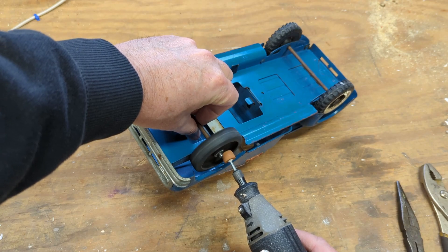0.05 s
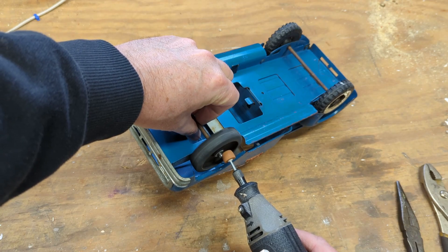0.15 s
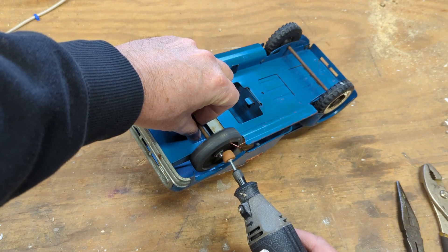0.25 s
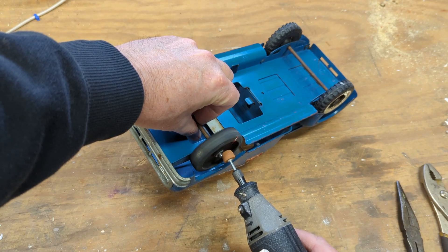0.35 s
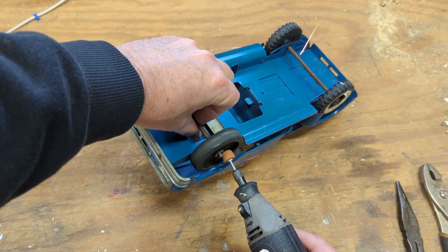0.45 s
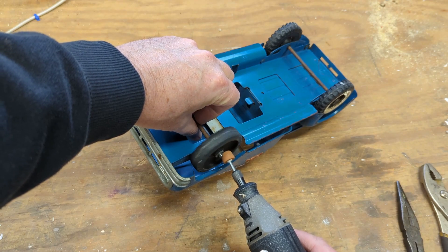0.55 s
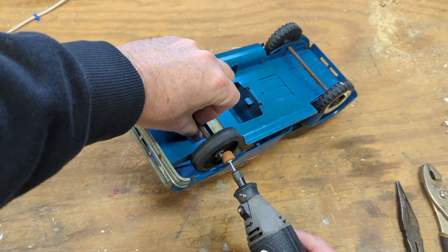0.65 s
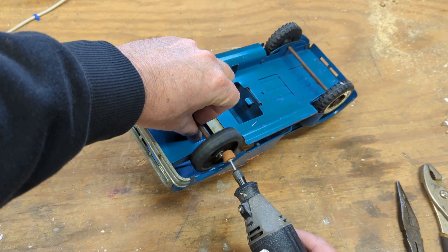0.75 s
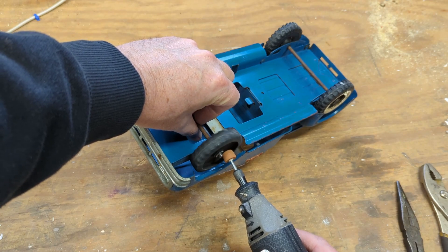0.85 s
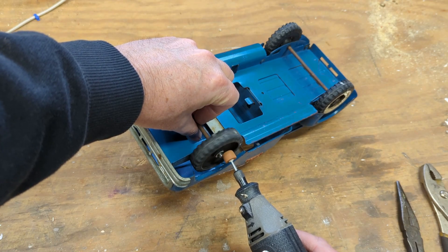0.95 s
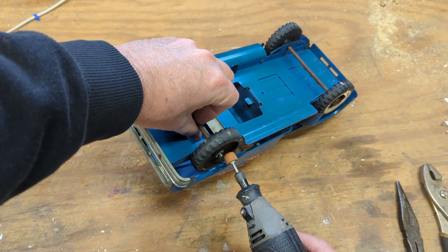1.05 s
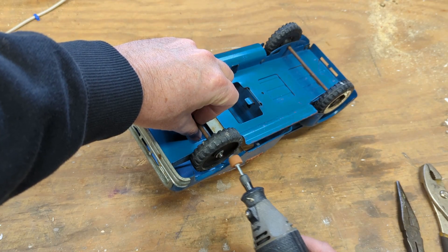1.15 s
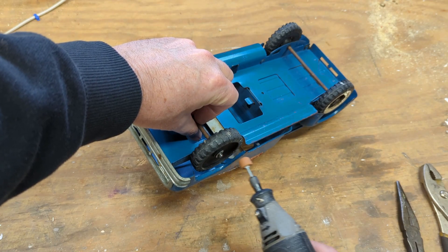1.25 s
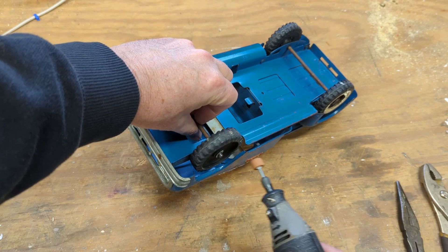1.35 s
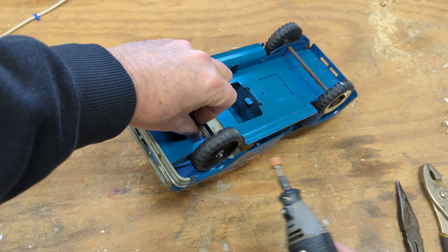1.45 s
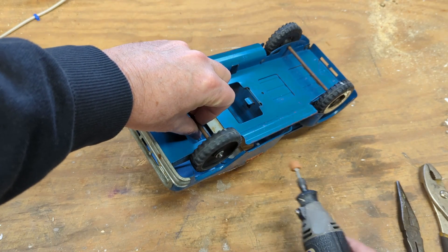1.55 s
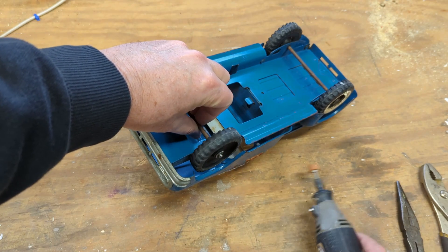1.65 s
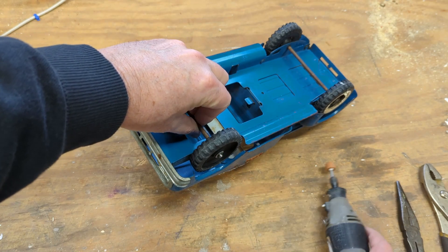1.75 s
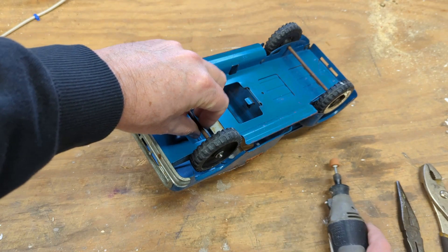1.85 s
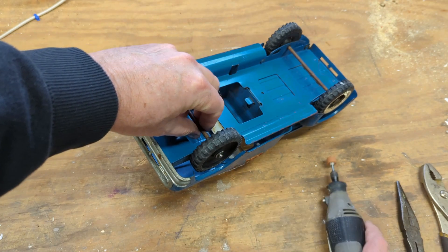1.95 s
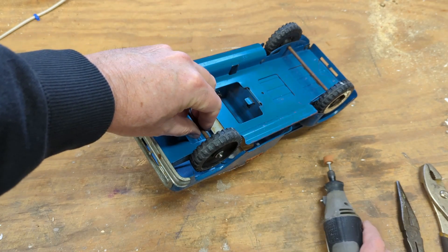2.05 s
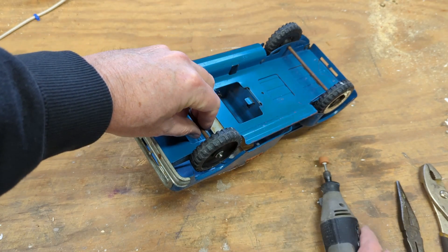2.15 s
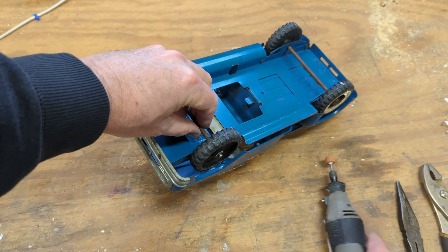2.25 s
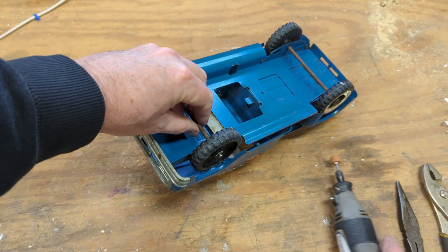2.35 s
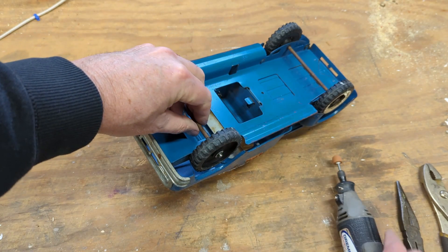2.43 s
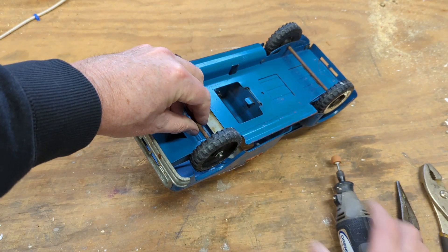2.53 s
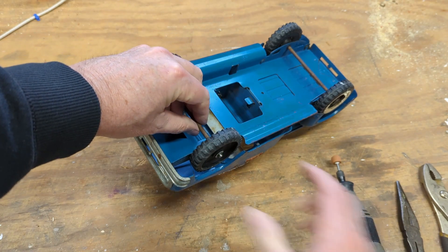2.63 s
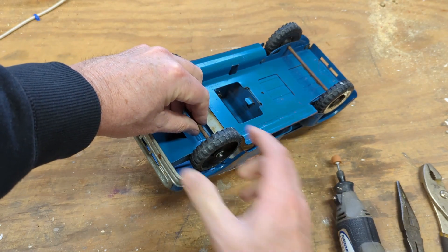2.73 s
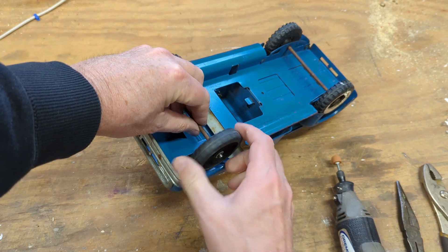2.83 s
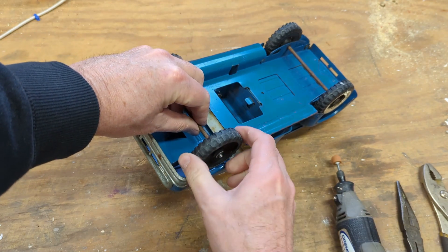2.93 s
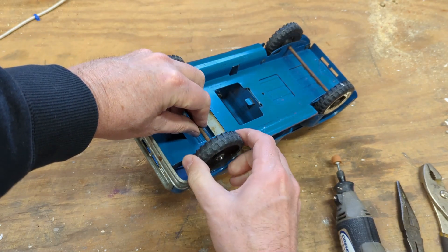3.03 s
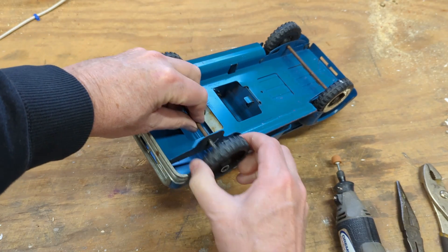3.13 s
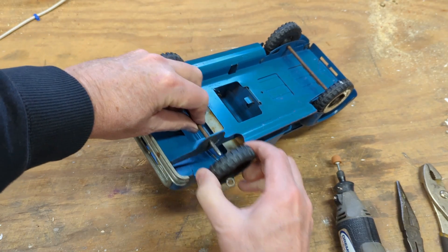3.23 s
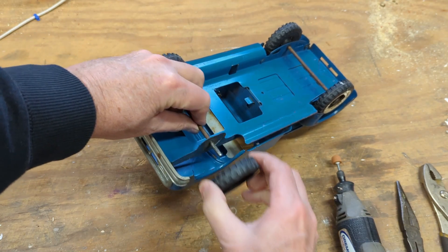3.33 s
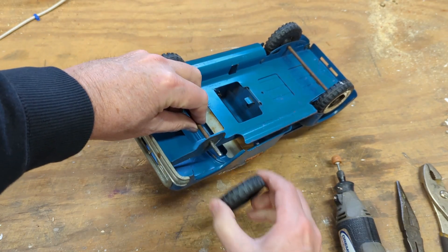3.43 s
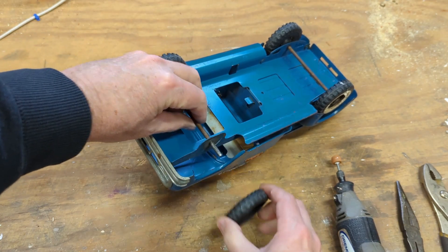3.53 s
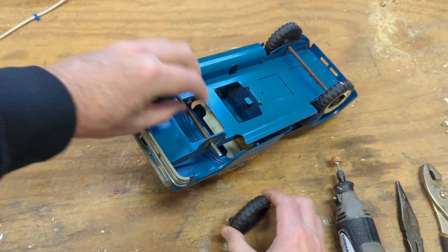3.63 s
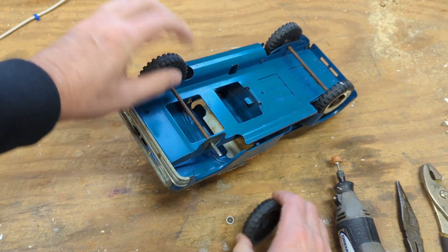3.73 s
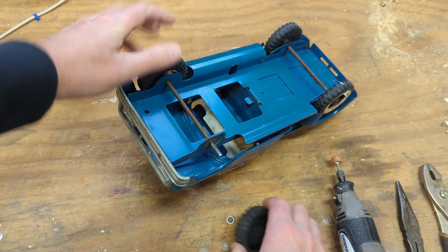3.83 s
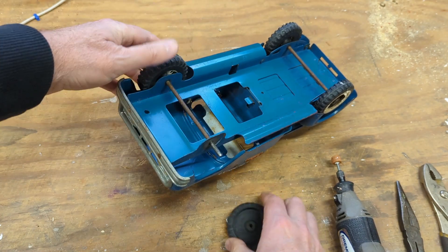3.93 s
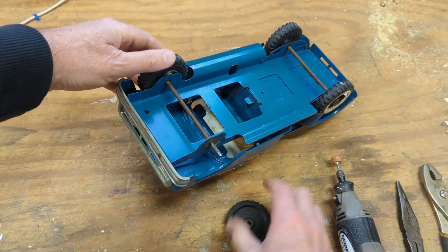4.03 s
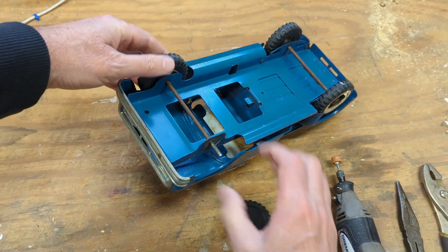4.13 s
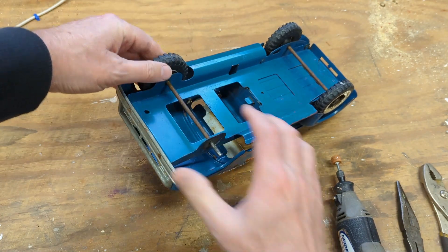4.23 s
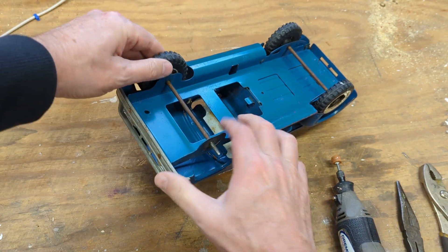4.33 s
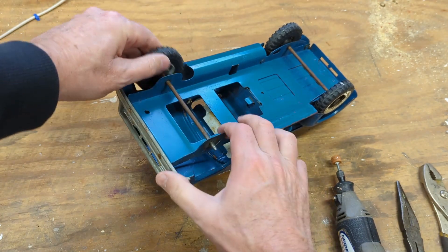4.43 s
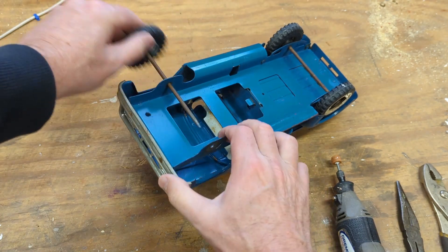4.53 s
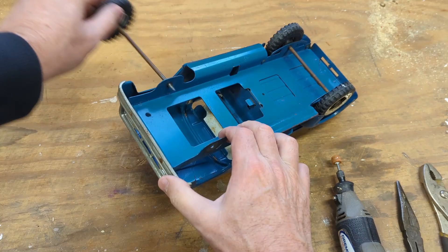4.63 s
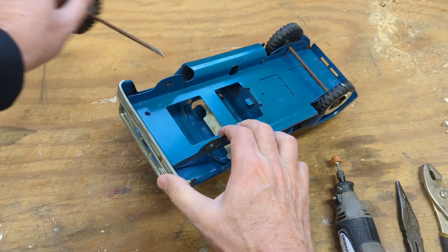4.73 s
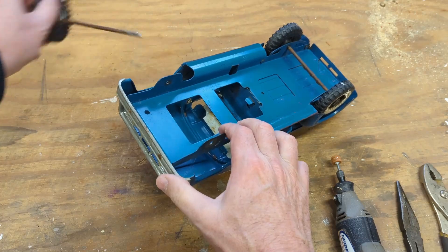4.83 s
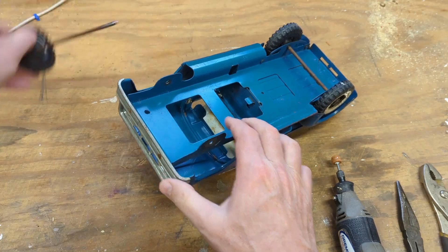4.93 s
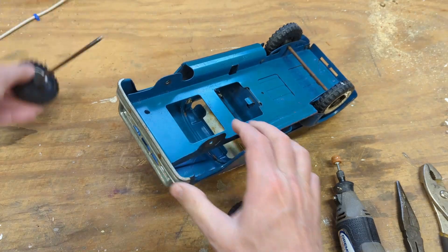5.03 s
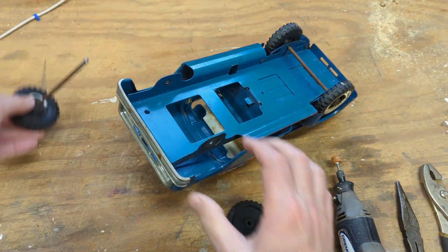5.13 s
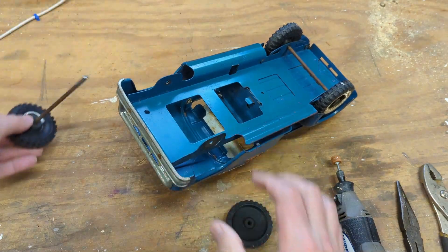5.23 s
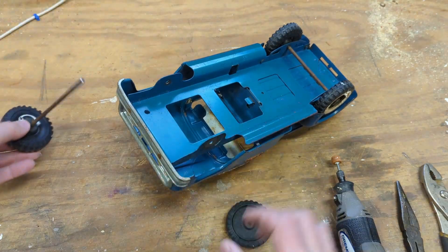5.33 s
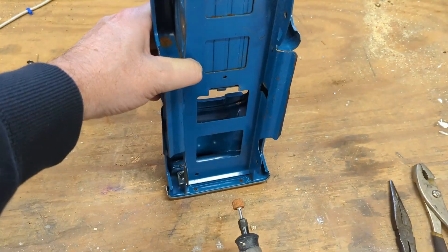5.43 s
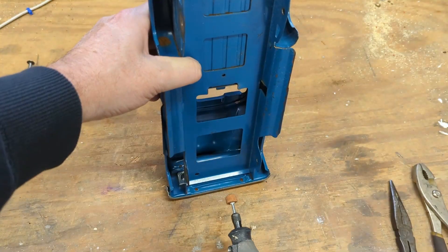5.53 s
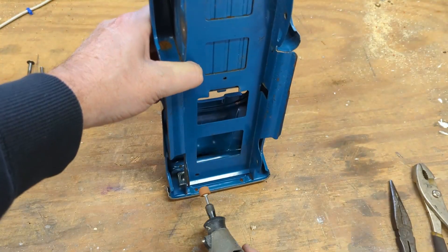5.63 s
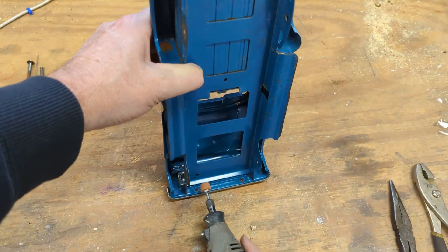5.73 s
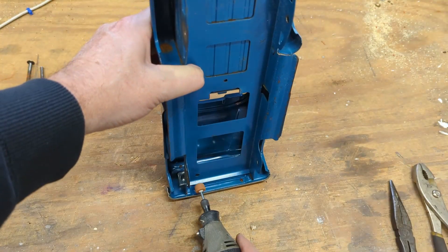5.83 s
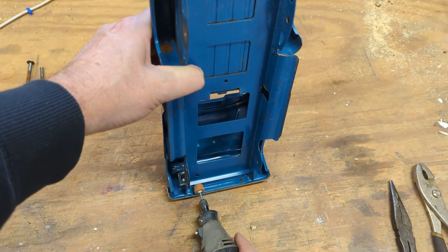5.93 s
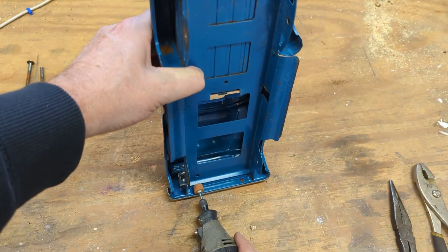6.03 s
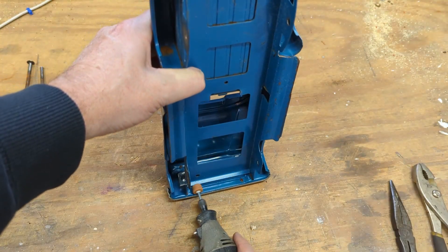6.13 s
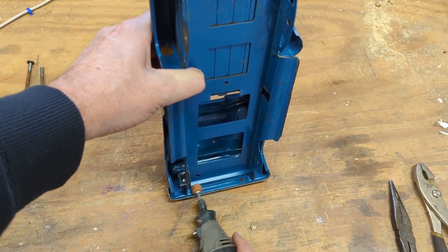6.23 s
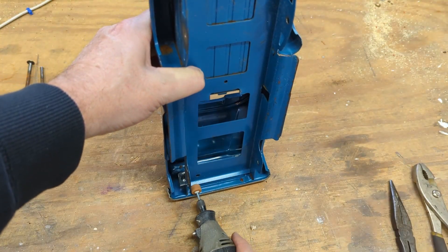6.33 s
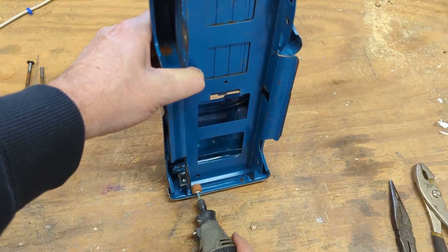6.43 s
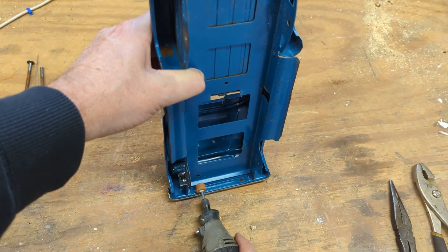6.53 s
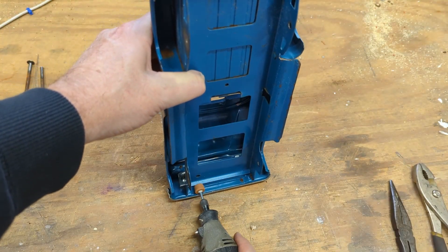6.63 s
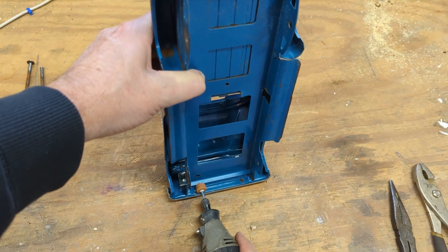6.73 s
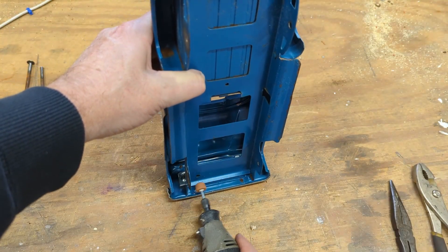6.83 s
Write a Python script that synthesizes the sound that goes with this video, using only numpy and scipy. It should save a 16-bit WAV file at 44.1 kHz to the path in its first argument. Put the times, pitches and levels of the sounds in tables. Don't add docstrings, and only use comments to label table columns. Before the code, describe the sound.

A small rotary tool whines and grinds steel, spins down on a wooden bench amid thuds, ticks and scraping, then grinds again.

```python
import sys
import numpy as np
from scipy import signal
from scipy.fft import rfft, irfft
from scipy.io import wavfile
from scipy.ndimage import uniform_filter1d

SR = 44100
rng = np.random.default_rng(int(sys.argv[2]) if len(sys.argv) > 2 else 0)


def generate_wav(signal):
    frames = np.transpose(np.atleast_2d(signal))
    scaled = np.clip(frames, -1, 1) * 32767
    pcm = np.round(scaled).astype(np.int16)
    wavfile.write(sys.argv[1], SR, pcm)


def voltage_ratio(decibels):
    exponent = np.asarray(decibels, float) / 20
    return 10 ** exponent


N = 303408

# f/Hz, side re mid/dB
STEREO_WIDTH = [(60, -15.5), (110, -12.5), (200, -17.5), (380, -5), (700, -6), (1290, -4.5), (2380, -4.5),
                (4400, 1), (8120, 0), (15000, 0.5)]


def in_time(rows, quiet=-120):
    s, *columns = np.transpose(rows)
    return [np.interp(np.arange(N) / SR, s, column, quiet, quiet) for column in columns]


def at_hz(points, hz, rings=()):
    point_hz, point_db = np.transpose(points)
    db = np.interp(np.log(hz + 1), np.log(point_hz), point_db)
    for centre_hz, width_hz, top_db in rings:
        db = db + top_db / (1 + (2 * (hz - centre_hz) / width_hz) ** 2)
    return db


def drift(rate):
    knots = rng.standard_normal(int(rate * N / SR) + 3)
    return np.interp(np.arange(N) * rate / SR, np.arange(len(knots)), knots) * np.sqrt(3 / 2)


def cut(x, hz, kind, order=4):
    return signal.sosfilt(signal.butter(order, hz, kind, fs=SR, output="sos"), x)


def noise(spectrum, rings=(), grain_db=0.0, ref_hz=1500):
    # f/Hz, level/dB
    lean_table = [(60, -1), (110, 1.5), (200, 0), (380, 2.5), (700, 1), (1290, -2), (2380, 0), (4400, -4.5),
                  (8120, 3), (15000, 0.5)]
    hz = np.fft.rfftfreq(N, 1 / SR)
    grit = rng.standard_normal((2, N)) * voltage_ratio(grain_db * rng.standard_normal(N))
    mid, side = rfft(grit) * voltage_ratio(at_hz(spectrum, hz, rings))
    side = side * voltage_ratio(at_hz(STEREO_WIDTH, hz))
    lean = voltage_ratio(at_hz(lean_table, hz) / 2)
    pair = np.array([(mid + side) * lean, (mid - side) / lean])
    return irfft(pair, N) * N / np.sqrt(2 * np.sum(np.abs(mid[hz > ref_hz]) ** 2))


def patchy(x, split_hz, low_db, patch_db):
    out = cut(x, split_hz, "low") * voltage_ratio(low_db + patch_db * drift(25))
    rest = cut(x, split_hz, "high")
    for edge_hz in (3000, 6000, 10000):
        part = cut(rest, edge_hz, "low", order=2)
        out = out + part * voltage_ratio(patch_db * drift(30))
        rest = rest - part
    return out + rest * voltage_ratio(patch_db * drift(30))


def tone(phase, hz):
    slip = np.arctan(voltage_ratio(at_hz(STEREO_WIDTH, hz))) * rng.choice([-1, 1])
    start = rng.uniform(0, 2 * np.pi)
    return np.sqrt(2) * np.sin(phase + start + np.array([[slip], [-slip]])) / np.cos(slip)


def orders(turns, phase, spectrum, rings, strong, line_db, waver_db, weight):
    out, on, extra_db = np.zeros((2, N)), weight > 1e-5, dict(strong)
    colour = at_hz(spectrum, np.arange(20000.), rings)
    colour = colour - 10 * np.log10(np.sum(voltage_ratio(colour[1500:]) ** 2))
    for k in range(3, 44):
        hz = np.minimum(k * turns[on], 19999)
        db = colour[hz.astype(int)] + line_db + extra_db.get(k, 0) + waver_db * drift(9)[on]
        out[:, on] += voltage_ratio(db) * (hz < 16500) * tone(k * phase[on], np.mean(hz))
    return out * weight


def tool_rush(rush, low_db):
    return voltage_ratio(-2.5) * patchy(rush, 1500, np.clip(low_db, -12, 12), patch_db=2.0)


def axle_grinding(turns, phase, scuff, weight, low_db):
    # f/Hz, level per Hz/dB
    colour = [(35, -69), (60, -39.5), (311, -14.5), (366, -18.5), (432, -11), (615, -22), (854, -7.5),
              (1500, -18.5), (1770, -8), (10600, -7), (11600, -6.5), (15400, -7), (16500, -44)]
    # f/Hz, width/Hz, level/dB
    resonances = [(1750, 26, -2.5), (4160, 74, 4.5), (5800, 42, -1), (6560, 40, 5.5), (7070, 170, 6),
                  (7540, 88, 9), (8750, 53, -6.5), (9930, 82, -12.5), (11400, 45, -1.5), (12000, 110, -1),
                  (12400, 72, -5.5), (14900, 89, -5)]
    # multiple of shaft speed, level over the others/dB
    strong = [(3, 8.5), (4, 7), (13, 5), (16, 4.0), (20, 13), (26, 8.5), (27, 6)]
    grit = scuff * weight * noise(colour, resonances, grain_db=3.5)
    lines = orders(turns, phase, colour, resonances, strong, line_db=17.0, waver_db=2.0, weight=weight)
    return tool_rush(grit, low_db) + lines


def free_running(turns, phase, throb, weight, low_db):
    # f/Hz, level per Hz/dB
    colour = [(35, -52), (60, -34.5), (258, -16.5), (334, -4), (573, -14.5), (938, -2), (1690, -7),
              (2770, -5.5), (3580, -7.5), (6150, -7.5), (8150, -4.5), (15000, -7.5), (16500, -34.5)]
    # f/Hz, width/Hz, level/dB
    resonances = [(950, 200, 2), (2500, 250, 5), (3830, 300, 3), (4420, 300, 4), (6280, 460, 10.5),
                  (10200, 600, -1.5), (12300, 700, 0)]
    # multiple of shaft speed, level over the others/dB
    strong = [(3, 10), (8, 10), (9, 4.0), (12, 2.4), (16, 4), (24, 5.0), (36, 7.0)]
    air = weight * noise(colour, resonances, grain_db=0.5)
    lines = orders(turns, phase, colour, resonances, strong, line_db=15.0, waver_db=4.0, weight=weight)
    return tool_rush(air, low_db) + throb * lines


def tailgate_grinding(turns, phase, scuff, weight, low_db):
    # f/Hz, level per Hz/dB
    colour = [(35, -68), (60, -43), (297, -26), (358, -14.5), (629, -34), (1330, -9.5), (1500, -11.5),
              (2040, -5), (2240, 1.5), (4860, -2), (6010, 1.5), (15000, -2.5), (16500, -24.5)]
    # f/Hz, width/Hz, level/dB
    resonances = [(1522, 44, 12.5), (2190, 44, -1.5), (3726, 130, 3), (5360, 52, -16.5), (6048, 60, 11),
                  (7530, 120, 10), (8930, 190, 8.5), (9600, 57, -6), (9810, 27, -6), (14300, 110, 2.5)]
    # multiple of shaft speed, level over the others/dB
    strong = [(3, 5.5), (4, 9.0), (5, 5.9), (6, 6.7), (7, 5.1), (15, 4.0), (16, 6.2), (23, 4.0)]
    grit = scuff * weight * noise(colour, resonances, grain_db=3.5)
    lines = orders(turns, phase, colour, resonances, strong, line_db=20.5, waver_db=8.0, weight=weight)
    return tool_rush(grit, low_db) + lines


def rotary_tool():
    # t/s, shaft speed/Hz, shaft tone/dB, 2nd order/dB, blade tone/dB,
    # rush above 1.5 kHz/dB, low rush re that/dB
    first_pass = [(0.0, 435.5, -36.5, -48, -42, -16, -5), (0.06, 440, -33.5, -44, -44, -16, -3),
                  (0.59, 435, -37.5, -44.5, -45, -16, 1.5), (0.73, 443, -33, -35, -61, -17, -2.5),
                  (0.77, 434, -34.5, -42, -44, -17, -1), (0.94, 437, -33, -46, -36, -23, 0),
                  (1.29, 478, -31.5, -48.5, -27, -29, 4.5), (1.53, 427, -33.5, -54, -36, -31.5, 7.5),
                  (1.89, 336, -47.5, -61, -40.5, -37, 10.5), (2.17, 295, -55, -68, -54, -42.5, 10),
                  (2.2, 274, -32.5, -47, -59, -41, -17), (2.26, 258.2, -15.5, -50, -61, -39, -26),
                  (2.29, 242, -35.5, -57, -51, -42, -19), (2.42, 228, -36, -59, -70, -45, -14),
                  (2.49, 208.3, -36.5, -49, -52, -44.5, -15), (2.64, 177, -29, -55, -56, -50, -23),
                  (2.82, 144, -41, -52, -68, -48.5, -20), (3.08, 85, -41.5, -56, -69, -57.5, -22),
                  (3.15, 71, -51, -64, -70, -49, -1), (3.16, 76, -42, -29, -48, -50, -3),
                  (3.2, 77, -46, -42, -79, -43, -3)]
    second_pass = [(5.58, 64.02, -52, -65, -103, -84.5, -36.5), (5.622, 112.8, -60, -83, -59, -49.5, 2.5),
                   (5.698, 234.4, -60.5, -89, -54, -37.5, -8), (5.792, 327.4, -57, -68, -67, -35, -3),
                   (5.88, 357.3, -43.5, -63, -40, -32, -5), (5.98, 381.6, -38.5, -57, -59, -37, 0),
                   (6.028, 386.8, -54, -59, -44, -23.5, 23), (6.274, 381, -43.5, -62, -50, -23.5, 12.5),
                   (6.788, 324, -44, -59, -33, -22.5, 8), (6.842, 336.8, -44, -63, -56, -35, -6),
                   (6.88, 360.6, -40, -67, -37, -34, -7)]
    # t/s, rush above 1.5 kHz/dB
    first_rush = [(0.0, -15), (0.028, -16.5), (0.054, -15), (0.868, -17), (0.918, -20), (0.958, -27.5),
                  (0.98, -33.5), (0.988, -19), (1.05, -17.5), (1.082, -27.5), (1.3, -28)]
    # t/s, contact 0-1
    contact = [(0, 0.99), (.93, 0.99), (.955, 0.02), (.98, 0), (.99, 1), (1.06, 1), (1.08, 0.01),
               (5.98, 0.03), (6.0, 1), (6.81, 0.98), (6.84, 0)]
    t = np.arange(N) / SR
    turns, shaft_db, twice_db, blade_db, rush_db, low_db = np.maximum(in_time(first_pass), in_time(second_pass))
    rush_db = np.where(t < first_rush[-1][0], in_time(first_rush)[0], rush_db)
    low_db = uniform_filter1d(low_db, 2000) - np.median(low_db[low_db > -99])

    turns = np.maximum(turns, 20) * (1 + 0.0012 * drift(40))
    phase = 2 * np.pi * np.cumsum(turns) / SR
    bite = in_time(contact, 0)[0]
    early = t < 4
    free = voltage_ratio(rush_db) * np.sqrt(1 - bite)
    grind = voltage_ratio(rush_db) * np.sqrt(bite)
    scuff = 1 + 0.27 * np.cos(phase)
    powered = (t < 1.32) | ~early
    throb = 1 + 0.41 * np.cos(2 * np.pi * 120 * t) * powered

    out = axle_grinding(turns, phase, scuff, grind * early, low_db)
    out += free_running(turns, phase, throb, free, low_db)
    out += tailgate_grinding(turns, phase, scuff, grind * ~early, low_db)
    out += voltage_ratio(shaft_db + 1.5 * drift(30)) * tone(phase, 250)
    out += voltage_ratio(twice_db + 2.9 * drift(22)) * tone(2 * phase, 400)
    blade_level = voltage_ratio(blade_db + 3.1 * drift(25)) * (1 - 0.7 * bite)
    return out + blade_level * tone(18 * phase, 3000)


def microphone_floor():
    floor_colour = [(20, -34), (60, -2), (100, 7), (250, -18.5), (900, -23), (16000, -51)]     # f/Hz, level per Hz/dB
    return voltage_ratio(-67) * noise(floor_colour, ref_hz=30)


def hands():
    # t/s, rumble under 600 Hz/dB, rustle above/dB
    moves = [(2.1, -68, -40), (2.24, -43, -45.5), (2.37, -35, -44.5), (2.49, -47.5, -45),
             (3.39, -47.5, -55), (3.72, -54.5, -63.5), (3.94, -62, -63.5), (4.05, -32, -71),
             (4.42, -52.5, -60.5), (4.57, -42, -26), (4.61, -41, -38), (4.72, -57, -46.5),
             (5.15, -63.5, -81), (5.44, -78, -72.5), (5.59, -70, -81), (5.68, -70, -70.5),
             (5.75, -58, -52.5)]
    # f/Hz, level per Hz/dB
    rustle_colour = [(350, -48), (600, -21.5), (860, -4), (4740, -16.5), (5150, -11.5), (9480, -21),
                     (15200, -28.5), (16500, -33.5)]
    rumble_colour = [(18, -69), (30, -38.5), (99, -6), (156, -7.5), (208, -3), (367, -1.5), (563, -23),
                     (900, -25.5), (1170, -51.5), (1980, -120)]
    rumble_db, rustle_db = in_time(moves)
    rumble = voltage_ratio(rumble_db + 3.6 * drift(40)) * noise(rumble_colour, ref_hz=60)
    rustle = voltage_ratio(rustle_db + 1.9 * drift(30)) * noise(rustle_colour, ref_hz=700)
    return rumble + rustle


def ring(hz, t60, t):
    return np.sin(2 * np.pi * hz * t) * voltage_ratio(-60 * t / t60)


def thuds():
    # t/s, peak level/dB, pitch/Hz, t60/s, edge re peak/dB
    blows = [(2.198, -8, 269, 0.11, -34), (2.315, -10.5, 260, 0.15, -39), (2.411, -32, 227.5, 0.12, -20),
             (3.155, -13, 151, 0.12, -30), (3.321, -17.5, 315, 0.13, -35), (3.382, -17, 148, 0.13, -30),
             (3.512, -23, 307, 0.13, -27.5), (3.892, -5, 287, 0.11, -42), (4.025, 2, 339, 0.11, -29),
             (4.072, -9.5, 377, 0.096, -33), (4.11, -16.5, 307, 0.1, -25.5), (4.129, -22, 256, 0.11, -25.5),
             (4.208, -21.5, 315, 0.11, -27.5), (4.274, -43, 417, 0.12, -13), (4.322, -25.5, 293, 0.12, -16),
             (4.373, -35, 342, 0.12, -17), (4.917, -23.5, 151, 0.14, -37)]
    # f/Hz, level/dB, t60/s
    board_modes = [(188, -12, 0.14), (300, -11.5, 0.23), (367, -3.5, 0.1), (417, -5, 0.087),
                   (500, -21.5, 0.45), (581, -6, 0.04), (668, -30.5, 0.34), (816, -22, 0.22)]
    out, t = np.zeros((2, N + SR)), np.arange(SR // 3) / SR
    for s, db, hz, t60, edge_db in blows:
        luck_db = rng.normal(0, 1.4, len(board_modes))
        body = ring(hz, 0.46 * t60, t)
        for (mode_hz, mode_db, mode_t60), chance_db in zip(board_modes, luck_db):
            body += voltage_ratio(mode_db + chance_db - 6) * ring(mode_hz, mode_t60 * t60 * 7.7, t)
        body *= 1 - np.exp(-t / 0.00089)
        puff = cut(rng.standard_normal((2, len(t))), [700, 3000], "band")
        puff *= voltage_ratio(edge_db + 20 - 60 * t / 0.078)
        start = round(s * SR)
        out[:, start:start + len(t)] += voltage_ratio(db - 4.5) * (body + puff)
    return out[:, :N]


def ticks():
    # t/s, peak level/dB, centre f/Hz, t60/s, left re right/dB
    contacts = [(2.4806, -23, 2090, 0.07, -4), (3.159, -26.5, 3590, 0.07, 3),
                (3.2091, -26.5, 10200, 0.081, 1.5), (3.2804, -42.5, 4850, 0.08, -2.5),
                (3.4456, -18, 6080, 0.05, 3), (3.5678, -30, 2490, 0.081, -4.5),
                (3.6212, -43, 2940, 0.062, -11), (3.702, -14, 6250, 0.07, -1.5),
                (3.8447, -46.5, 3030, 0.07, 1.5), (3.8926, -41, 1680, 0.07, -2.5),
                (3.9894, -53, 1510, 0.092, 0), (4.0267, -19.5, 1660, 0.07, 1.5),
                (4.1007, -40, 1720, 0.065, -6), (4.1925, -34.5, 2130, 0.059, 1.5),
                (4.2942, -12.5, 6240, 0.062, -0.5), (4.9475, -43, 2570, 0.07, -1.0),
                (4.9694, -43.5, 2940, 0.07, 7), (5.1397, -58.5, 8610, 0.07, -3.5),
                (5.4061, -49, 2020, 0.07, 3.5)]
    # f/Hz, level/dB, t60/s
    sheet_modes = [(840, -13.5, 0.31), (952, 7, 0.29), (1950, -2, 0.22), (2830, -2.5, 0.18),
                   (3650, -7.5, 0.13), (4317, -21, 0.29), (5140, -10.5, 0.12), (5652, -21, 0.14),
                   (6200, -13.5, 0.21), (7470, -20.5, 0.12), (7585, -26, 0.18), (8624, -13, 0.13)]
    out, t = np.zeros((2, N + SR)), np.arange(SR // 3) / SR
    for s, db, hz, t60, pan_db in contacts:
        white = rng.standard_normal((2, len(t)))
        luck_db = rng.normal(0, 4.4, len(sheet_modes))
        hump = cut(white, [hz / 1.6, min(hz * 1.1, 19000)], "band", order=1)
        decay = voltage_ratio(-60 * t / t60) + voltage_ratio(-29.0 - 60 * t / 0.3)
        sound = (1.5 * hump + 0.23 * cut(white, 830, "high")) * decay
        for (mode_hz, mode_db, mode_t60), chance_db in zip(sheet_modes, luck_db):
            near_db = -9 * abs(np.log2(mode_hz / hz))
            sound += voltage_ratio(mode_db + chance_db + near_db - 10.5) * ring(mode_hz, mode_t60, t)
        pan = np.array([[pan_db], [-pan_db]]) / 2
        start = round(s * SR)
        out[:, start:start + len(t)] += voltage_ratio(db - 6.5 + pan) * sound
    return out[:, :N]


def axle_scrape():
    # t/s, scrape level/dB, low part re that/dB
    pull = [
        (4.3, -56, 23),
        (4.404, -53.5, 13),
        (4.508, -28, 15),
        (4.586, -38.5, 11),
        (4.626, -41, 2),
        (4.716, -39, 8),
        (4.9, -85.5, 7),
    ]
    # f/Hz, level per Hz/dB
    colour = [(88, -54), (150, -22), (343, -13), (583, -6), (669, -14), (1160, -10), (1280, -11.5),
              (6050, -9), (12800, -21), (15600, -27), (16500, -54.5)]
    # f/Hz, width/Hz, level/dB
    resonances = [(339, 47, 12), (576, 26, 2.5), (1160, 33, -1), (1410, 34, -6.5), (2270, 34, 0.5),
                  (2880, 250, 1), (4780, 110, -11.5), (6150, 130, -5.5), (7800, 160, -13), (8400, 110, -19)]
    db, low_db = in_time(pull)
    grit = noise(colour, resonances, grain_db=5.0) * voltage_ratio(db + 2.5 * drift(70))
    return patchy(grit, 1500, np.clip(low_db - 6, -15, 15), patch_db=4.5)


def far_hum():
    # t/s, f/Hz, level/dB
    glide = [
        (5.38, 89.7, -76),
        (5.412, 89.3, -55),
        (5.594, 90.5, -48.5),
        (5.876, 97.7, -60),
        (5.95, 90.4, -70),
    ]
    hum_hz, hum_db = in_time(glide)
    return voltage_ratio(hum_db) * tone(2 * np.pi * np.cumsum(hum_hz) / SR, 90)


def scene():
    return (rotary_tool() + microphone_floor() + hands() + thuds() + ticks()
            + axle_scrape() + far_hum())


def low_pass(x):
    return signal.sosfilt(signal.butter(12, 16850, fs=SR, output="sos"), x)


def record(dry):
    fold_hz = 8000
    near = cut(dry, [fold_hz * 0.975, fold_hz * 1.09], "band")
    carrier = 2 * np.cos(2 * np.pi * 2 * fold_hz * np.arange(N) / SR)
    mirror = cut(near * carrier, [7000, 9000], "band")
    return low_pass(dry + voltage_ratio(-4.5) * mirror)


dry = scene()
out = record(dry)
generate_wav(out)
```